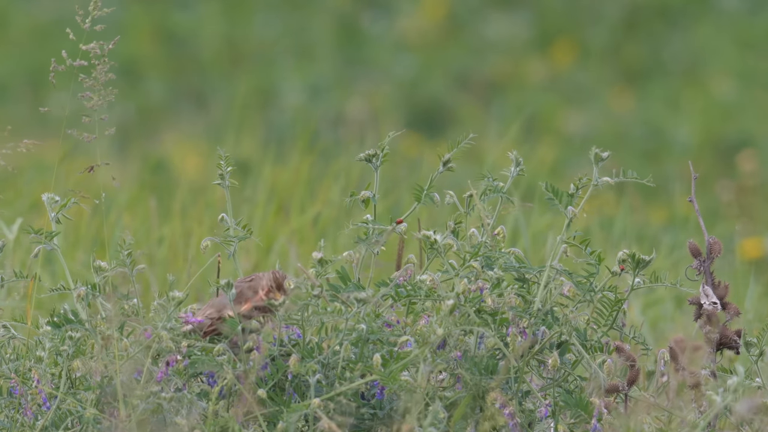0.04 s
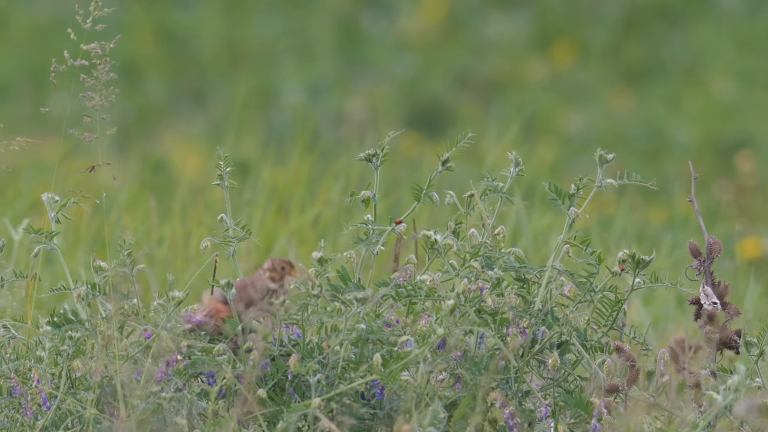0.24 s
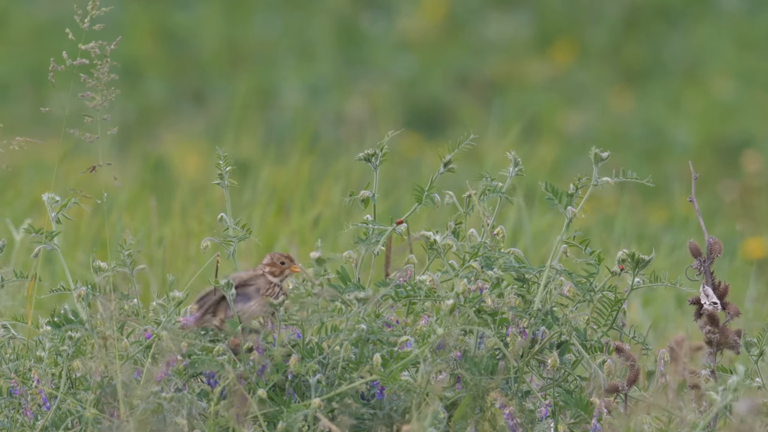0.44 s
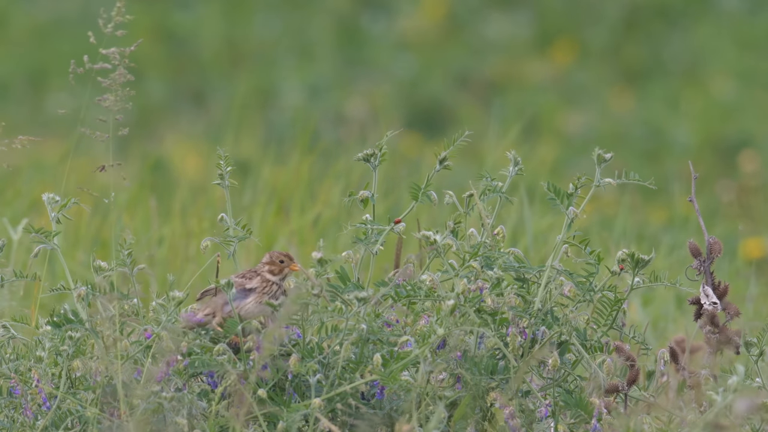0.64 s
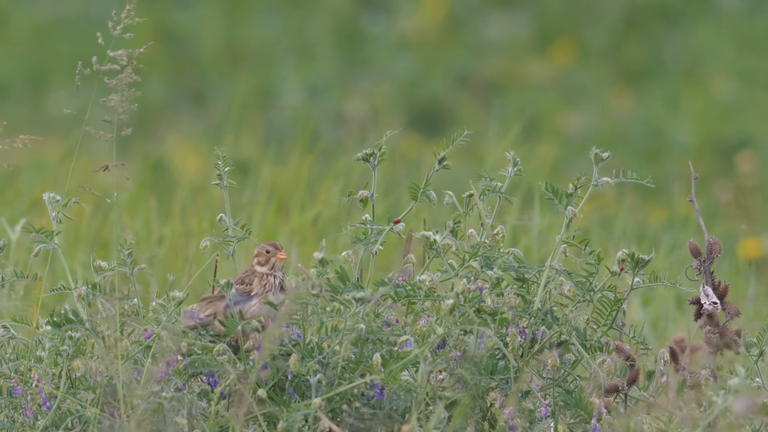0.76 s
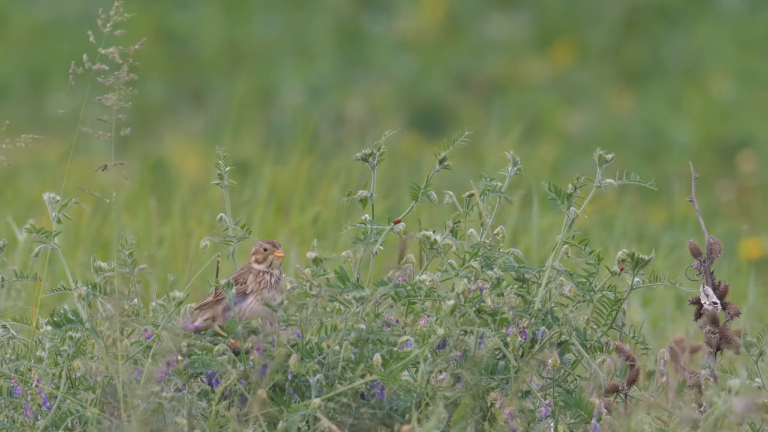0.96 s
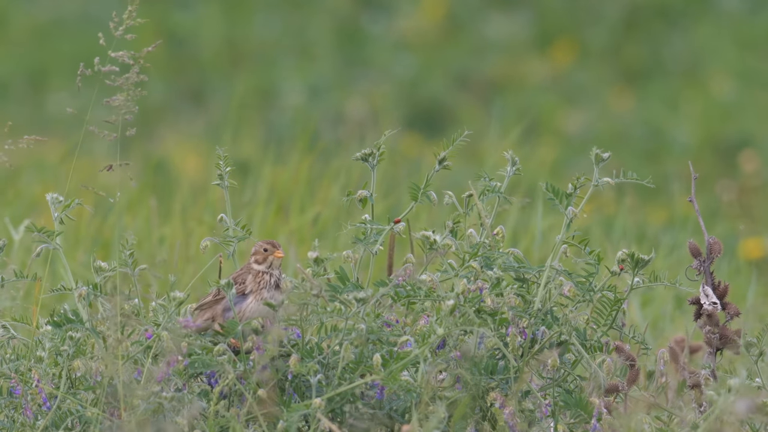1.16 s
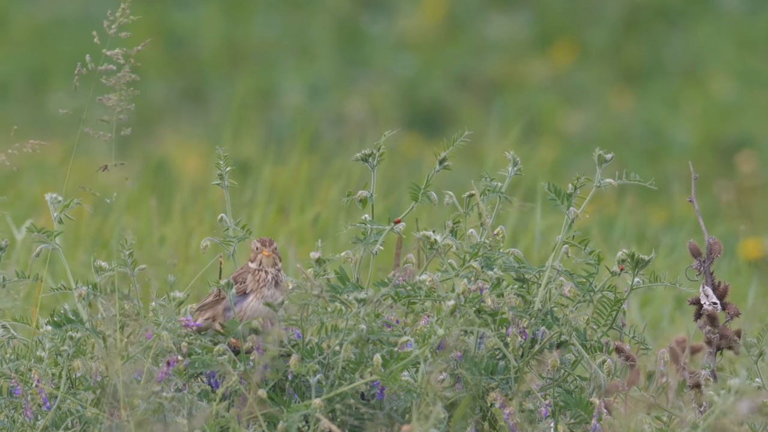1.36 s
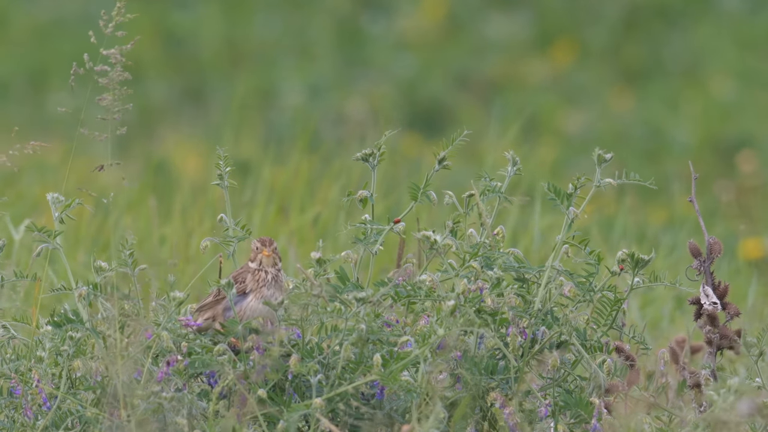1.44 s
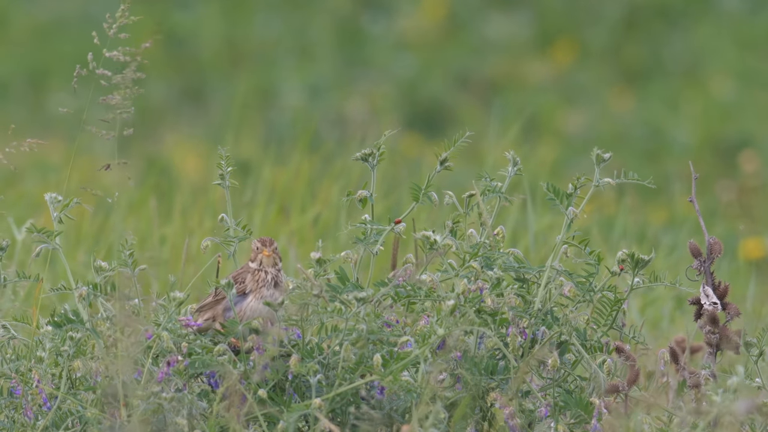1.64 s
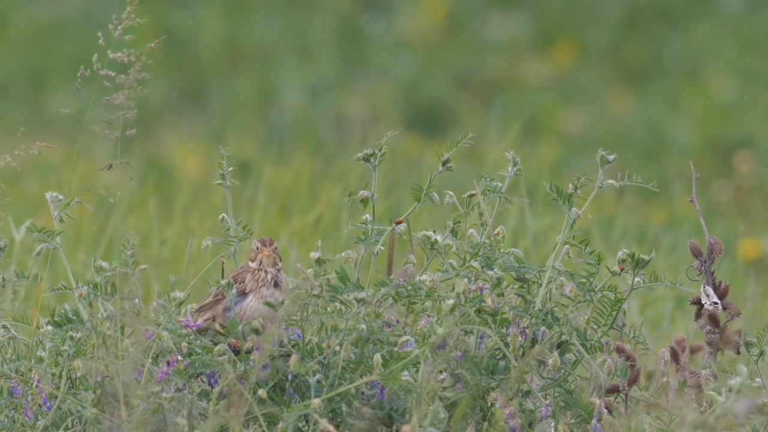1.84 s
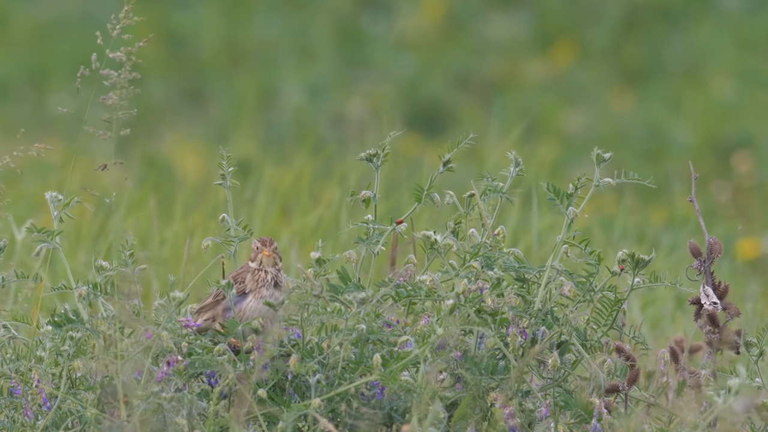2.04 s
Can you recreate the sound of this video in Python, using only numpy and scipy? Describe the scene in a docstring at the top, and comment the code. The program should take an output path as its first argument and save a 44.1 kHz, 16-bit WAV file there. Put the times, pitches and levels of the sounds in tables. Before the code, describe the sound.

A bunting ticks, rattles and trills while other birds call over a soft wind hiss.

```python
"""Songbirds in an open meadow

One bird throws out a bright, falling, warbling burst. A bunting ticks faster and faster, breaks into a
jangling rattle and ends in a trill. Other birds call farther off, over a steady hiss of wind in the grass.
Each note is a gliding whistle (a sine wave that slides in pitch), scattered a little by the plants."""
import sys
import numpy as np
from scipy import signal
from scipy.fft import rfft, irfft
from scipy.io import wavfile
from scipy.ndimage import uniform_filter1d

SR = 44100
rng = np.random.default_rng(int(sys.argv[2]) if len(sys.argv) > 2 else 0)


def master_out(mix):
    """Clip the mix to full scale and print it as 16-bit PCM to the path in sys.argv[1]."""
    frames = np.transpose(np.atleast_2d(mix))
    ceiling = np.clip(frames, -1, 1)
    pcm = np.round(ceiling * 32767).astype(np.int16)
    wavfile.write(sys.argv[1], SR, pcm)


N = 92610
WAVER_HZ, WAVER_DB = 36.3, 0.04   # how unsteady a bird's pitch and loudness are


def from_db(db):
    """Turn decibels (dB) into a number to multiply a sound by."""
    return 10 ** (np.asarray(db) / 20)


def rms_one(x):
    """Scale a signal so that its average strength (rms) is 1."""
    return x / np.sqrt(np.mean(x ** 2) + 1e-20)


def at_hz(points, hz):
    """Read between the rows of a (frequency, value) table, giving each octave equal room."""
    freqs, values = np.array(points).T
    return np.interp(np.log(hz + 1e-9), np.log(freqs), values)


def drift(rate_hz):
    """A smooth random wobble of about size 1; a higher rate makes it quicker."""
    r = np.exp(-2 * np.pi * rate_hz / SR)
    return rms_one(signal.lfilter([1], [1, -2 * r, r * r], rng.standard_normal(N + SR))[SR:])


def span(start_s, length_s):
    """The sample numbers i that a note covers, and its progress u from 0 to 1."""
    i = np.arange(max(int(start_s * SR) + 1, 0), min(int((start_s + length_s) * SR), N))
    return i, (i / SR - start_s) / length_s


def glides(rows):
    """Notes that bend smoothly through a start, middle and end pitch."""
    for start_s, length_s, first, middle, last, db in rows:
        i, u = span(start_s, length_s)
        bend = (2 * middle - first - last) * 2 * u * (1 - u)
        yield i, u, first + (last - first) * u + bend, db


def runs(rows, note_s):
    """One short glide repeated evenly, growing louder or softer along the run."""
    for start_s, count, spacing_s, first, last, first_db, last_db in rows:
        for k, db in enumerate(np.linspace(first_db, last_db, count)):
            yield from glides([(start_s + k * spacing_s, note_s, first, (first + last) / 2, last, db)])


def sing(notes):
    """A bird's voice box: one slightly unsteady sine wave for each note (samples, progress, Hz, dB)."""
    out, waver_hz, waver_db = np.zeros(N), WAVER_HZ * drift(160), WAVER_DB * drift(160)
    edge = 0.36   # share of a note spent fading in, and again fading out
    for i, u, hz, db in notes:
        phase = 2 * np.pi * np.cumsum(hz + waver_hz[i] * hz / 5000) / SR   # high notes waver more
        fade = np.sin(np.pi / 2 * np.clip(np.minimum(u, 1 - u) / edge, 0, 1))
        out[i] += fade * from_db(db + waver_db[i]) * np.sin(phase)
    return out


def stereo_noise(spectrum):
    """Shaped noise, alike in both ears in the bass and almost unrelated in the treble."""
    # How alike left and right are. Each row: frequency in Hz, likeness (1 the same, 0 unrelated).
    likeness = [(60, 0.96), (170, 1), (350, 0.97), (700, 0.77), (1400, -0.06), (2800, 0.079), (5500, -0.22),
                (12000, 0.077)]
    hz = np.arange(N // 2 + 1) * SR / N
    mid, side = rfft(rng.standard_normal((2, N)))
    alike = at_hz(likeness, hz)
    pair = np.sqrt(1 + alike) * mid + np.sqrt(1 - alike) * side * [[1], [-1]]
    return rms_one(irfft(from_db(at_hz(spectrum, hz)) * pair, N))


def wind():
    """The steady rush of wind and far-off air."""
    # The tone of the wind. Each row: frequency in Hz, relative level in dB.
    spectrum = [(20, -20), (35, -9), (55, -3), (130, -1), (330, 0), (650, -2), (1000, -3.5), (1800, -5),
                (2400, -9), (3300, -8), (7000, -17.5), (9000, -12), (12000, -14.5), (15500, -20.5)]
    return from_db(-59.5) * stereo_noise(spectrum)


def grass_and_chorus():
    """Grass and distant birds blend into a high hiss in which each narrow band flickers by itself."""
    # The tone of the hiss. Each row: frequency in Hz, relative level in dB.
    spectrum = [(2300, -29), (3200, -5.5), (4000, -1.5), (5000, 3.5), (5700, 1), (6700, -7), (7400, -4.5),
                (8200, -69)]
    hiss, hz = rfft(stereo_noise(spectrum)), np.arange(N // 2 + 1) * SR / N
    edges_hz, flicker_db, out = np.geomspace(2400, 8400, num=13), 2, 0
    for low, high in zip(edges_hz, edges_hz[1:]):
        band = irfft(hiss * (hz >= low) * (hz < high), N)
        out = out + band * from_db(flicker_db * drift(23))
    return from_db(-61.5) * rms_one(out) * from_db([[-1.75], [1.75]])   # louder on the right


def chirps():
    """Tiny, faint slides up or down, at random times, from birds all over the meadow."""
    per_second, length_s, low_hz, high_hz, max_slide_hz = 49, .011, 3398, 6840, 487
    for when, pitch, slide, softness in rng.random((int(per_second * N / SR), 4)):
        hz, half = low_hz + (high_hz - low_hz) * pitch, max_slide_hz * (slide - .5)
        yield from glides([(when * N / SR, length_s, hz + half, hz, hz - half, -59.5 - 4 * softness)])


def falling_burst():
    """One unbroken, warbling whistle that slurs from note to note."""
    # The burst's notes. Each row: start and length in seconds, start, middle and end pitch in Hz,
    # level in dB.
    notes = [(.052, 0.033, 6760, 7000, 7200, -57), (.088, .044, 7400, 7000, 6660, -52),
             (.130, .034, 6800, 6410, 6000, -36), (.161, 0.0037, 6200, 5270, 4100, -44),
             (.178, .009, 4095, 5850, 7040, -41.5), (.190, 0.0055, 7220, 5990, 4200, -42),
             (.195, 0.01, 3920, 6580, 4040, -36), (.208, 0.009, 4360, 6270, 4740, -32.5),
             (.220, .012, 5080, 5830, 5020, -32), (.231, 0.019, 5850, 5670, 5320, -34.5),
             (.256, 0.013, 6800, 6330, 6200, -38), (.266, 0.0083, 5810, 6170, 6350, -39),
             (.277, .014, 6960, 6300, 5500, -39.5), (.289, 0.012, 6060, 5930, 5400, -35.5),
             (.301, 0.012, 5870, 5660, 4900, -36.5), (.311, 0.018, 5250, 4890, 4370, -44)]
    pitch, gain = np.zeros(N), np.zeros(N)
    for i, u, hz, db in glides(notes):
        pitch[i], gain[i] = hz, from_db(db)
    sung = np.flatnonzero(pitch)
    pitch = np.interp(np.arange(N), sung, pitch[sung]) + WAVER_HZ * drift(204)   # slide across the gaps
    slur = int(0.0018 * SR)   # the notes run into each other over this many samples
    gain = uniform_filter1d(uniform_filter1d(gain, slur), slur) * from_db(WAVER_DB * drift(120))
    return gain * np.sin(2 * np.pi * np.cumsum(pitch) / SR)


def ticks():
    """Each of the bunting's ticks opens with a rasp, catches briefly and ends as a clean falling note."""
    # The ticks. Each row: start in seconds, pitch in Hz, level in dB.
    notes = [(0.099, 4640, -44.5), (0.37, 4900, -50), (.473, 4880, -46), (.561, 4820, -43),
             (.634, 4770, -44), (0.704, 4930, -40), (0.77, 4970, -42.5)]
    length_s, rasp_hz, rasps_per_s, rasp_db, catch_db = .026, 520, 450, -1, -7
    rough = drift(850)
    for start_s, hz, db in notes:
        i, u = span(start_s, length_s)
        opening = np.clip((.5 - u) * 10, 0, 1)   # 1 at first, 0 from halfway on
        rasp = opening * (np.sin(2 * np.pi * rasps_per_s * u * length_s) + rough[i]) / 2
        catch = np.exp(-((u - .5) * 20) ** 2)
        fall_hz = (1 - opening) * 1200 * (.565 - u)
        yield i, u, hz + rasp_hz * rasp + fall_hz, db + rasp_db * opening + catch_db * catch


def far_calls():
    """Single whistles from birds farther off."""
    # The calls. Each row: start and length in seconds, start, middle and end pitch in Hz, level in dB.
    notes = [(.111, 0.0097, 4640, 4400, 4280, -45.5), (.131, 0.01, 4200, 4330, 4600, -57),
             (.148, 0.01, 3770, 3880, 4250, -58), (.166, .010, 3700, 3620, 3480, -54),
             (.186, 0.013, 3450, 3280, 3130, -53.5), (.248, 0.013, 4750, 4390, 4170, -45),
             (.333, 0.017, 5070, 4600, 3700, -51.5), (.413, 0.0066, 5050, 5030, 4950, -61),
             (.444, 0.013, 6600, 6100, 5950, -54.5), (.555, 0.095, 6040, 6790, 6550, -57.5),
             (.654, 0.012, 6300, 5600, 5600, -52), (.525, 0.13, 1930, 1845, 1770, -61),
             (.910, .050, 2578, 2484, 2416, -53.5), (.910, 0.034, 3950, 3650, 3350, -61.5),
             (.940, .035, 7100, 6780, 6160, -53), (.980, 0.09, 3850, 4030, 4340, -60),
             (1.165, 0.061, 3350, 3850, 3330, -54), (1.232, 0.023, 3430, 3360, 2930, -46.5),
             (1.275, .090, 3950, 4240, 4650, -57.5), (1.285, .075, 4110, 3840, 3700, -61),
             (1.340, 0.085, 3490, 3670, 3040, -51), (1.420, .130, 3590, 3370, 3230, -60),
             (1.514, 0.0257, 2620, 2315, 2080, -55.5), (1.606, 0.016, 3690, 2636, 1960, -54),
             (1.741, 0.024, 2280, 2272, 2230, -51.5), (1.700, 0.087, 6780, 6690, 5400, -64),
             (1.770, 0.039, 5190, 4230, 3600, -60.5), (1.895, 0.092, 1750, 1727, 1460, -59.5),
             (2.052, 0.046, 4500, 4550, 4580, -54.5), (.905, .030, 1950, 1785, 1690, -64),
             (.955, 0.03, 1650, 1500, 1410, -63), (1.575, 0.026, 2670, 2780, 2900, -59.5),
             (1.672, .014, 4200, 4340, 4650, -61.5)]
    return glides(notes)


def twitters():
    """Distant birds repeat one tiny note quickly."""
    # The twitters. Each row: start in seconds, number of notes, spacing in seconds,
    # each note's start and end pitch in Hz, first and last note's level in dB.
    rows = [(.538, 7, .041, 3540, 3320, -61, -60.5), (1.718, 7, .0135, 3636, 3190, -54.5, -59.5),
            (1.765, 4, .0115, 4210, 3740, -75, -67), (1.985, 5, .024, 6430, 6740, -65, -57)]
    return runs(rows, note_s=0.0145)


def cuckoo():
    """A cuckoo very far away sings two notes, the second one lower."""
    # The notes. Each row: start and length in seconds, start, middle and end pitch in Hz, level in dB.
    notes = [(.660, 0.107, 647, 632, 575, -63.5), (.935, 0.12, 544, 552.4, 544, -61.5)]
    return glides(notes)


def jangle():
    """The bunting's rattle is flung between a high and a low voice."""
    # The notes. Each row: start and length in seconds, start, middle and end pitch in Hz, level in dB.
    notes = [(.809, 0.0074, 7200, 7030, 7100, -44), (.823, 0.0076, 6400, 7000, 7340, -45),
             (.971, 0.01, 5630, 5580, 5300, -51), (.991, 0.011, 7660, 5520, 5070, -39.5),
             (1.034, 0.0061, 5740, 5320, 5100, -40), (1.061, 0.013, 5740, 5420, 5150, -40.5),
             (1.075, 0.0074, 7200, 7100, 6900, -43), (1.108, 0.0079, 6900, 7140, 6000, -41),
             (1.112, 0.0076, 6060, 5370, 5400, -40.5), (1.130, .010, 5600, 7000, 7100, -44),
             (1.145, 0.02, 7030, 7250, 7130, -40), (1.161, .006, 7200, 6170, 5300, -41),
             (1.165, 0.0058, 5400, 5500, 5250, -42), (1.176, 0.0086, 5100, 5050, 4850, -48.5),
             (1.191, 0.0075, 4850, 4780, 4600, -44.5), (1.207, 0.0075, 4650, 4490, 4480, -43.5),
             (1.224, 0.0073, 4500, 4380, 4300, -48), (1.244, 0.011, 4300, 4130, 4000, -52),
             (1.225, 0.0063, 7300, 7240, 7200, -43), (1.237, 0.0063, 7050, 7200, 7200, -43),
             (1.253, 0.015, 5880, 5460, 5120, -43.5), (1.275, 0.0059, 6930, 7220, 7350, -35),
             (1.287, 0.0052, 7060, 7240, 7400, -36.5), (1.302, 0.0089, 6750, 7200, 7700, -33.5),
             (1.321, .011, 5900, 5500, 5100, -43.5), (1.342, 0.0096, 7000, 7300, 7440, -40.5),
             (1.371, 0.0078, 7640, 6830, 5300, -38.5), (1.384, 0.013, 7020, 6880, 5240, -37),
             (1.399, 0.01, 7150, 6800, 5570, -44), (1.416, 0.0095, 7370, 6540, 4800, -38)]
    return glides(notes)


def chips():
    """Runs of very short notes that swell inside the rattle."""
    # The runs. Each row: start in seconds, number of chips, spacing in seconds,
    # each chip's start and end pitch in Hz, first and last chip's level in dB.
    rows = [(.843, 8, .0137, 5560, 4880, -49, -41.5), (.966, 9, .0134, 3980, 5710, -53, -48),
            (1.2405, 4, 0.034, 6900, 4640, -47.5, -44)]
    return runs(rows, note_s=0.00546)


def buzzes():
    """The bunting whips its pitch up and down hundreds of times a second, which sounds like a buzz."""
    # The rattle's buzzes. Each row: start and length in seconds, pitch and its swing each way in Hz,
    # sweeps per second, start and end level in dB.
    notes = [(.850, 0.12, 5170, 545, 320, -43.5, -49), (0.975, 0.047, 5550, 496, 310, -44, -51),
             (1.005, 0.076, 5630, 1220, 264, -43.5, -45), (1.082, 0.032, 5700, 480, 310, -40, -46.5),
             (1.12, 0.051, 5510, 614, 210, -43.5, -49), (1.201, 0.016, 5400, 700, 430, -49, -35.5),
             (1.339, 0.11, 5300, 400, 200, -53, -48.5), (1.46, 0.023, 5290, 600, 400, -53.5, -41.5)]
    uneven, throbs_per_s = drift(128), 76
    for start_s, length_s, hz, swing, rate, start_db, end_db in notes:
        i, u = span(start_s, length_s)
        turn = 2 * np.pi * np.cumsum(rate * (1 + 0.207 * uneven[i])) / SR
        sweep_db = 3.3 * (np.sin(turn) - 1)   # louder on the way down
        throb_db = -np.sin(2 * np.pi * throbs_per_s * u * length_s)
        yield i, u, hz + swing * np.cos(turn), start_db + (end_db - start_db) * u + sweep_db + throb_db


def croak():
    """One hoarse, far call: tones at three and four times the shaky pitch of a low voice."""
    i, u = span(start_s=1.255, length_s=0.038)
    hz, db = 422.4 * (1 + 0.075 * drift(240)[i]), -57
    return [(i, u, harmonic * hz, db) for harmonic in (3, 4)]


def trill():
    """Two closing trills, made of short notes that all slide down in the same way."""
    # The notes. Each row: start in seconds, middle pitch in Hz, level in dB.
    notes = [(1.488, 6800, -47), (1.515, 6750, -43), (1.541, 6630, -45), (1.571, 6730, -42),
             (1.599, 6450, -49), (1.63, 6600, -51), (1.842, 5280, -64), (1.888, 5370, -60.5),
             (1.922, 5300, -61), (1.953, 5420, -55), (1.986, 5420, -52.5), (2.023, 5450, -52),
             (2.071, 5300, -58)]
    length_s, fall_hz = 0.0125, 950
    return glides((s, length_s, hz + fall_hz / 2, hz, hz - fall_hz / 2, db) for s, hz, db in notes)


def echoes(fade_s):
    """The left and right spectrum of a wash of tiny echoes that dies away by 60 dB in fade_s seconds."""
    t = np.arange(SR // 2) / SR
    wash = rng.standard_normal((2, len(t))) * from_db(-60 * t / fade_s)
    return rfft(wash / np.sqrt((wash ** 2).sum(axis=1, keepdims=True)), 2 * N)


def meadow(voice, singer):
    """Place a singer between two microphones; add quick scatter from the plants and a fainter tail."""
    # Scatter from the plants. Each entry: singer, level in dB compared with the direct sound.
    scatter_db = {"burst": -14, "ticks": -4.5, "rattle": -7, "far": -3}
    # Each microphone hears the birds with its own tone. Each row: frequency in Hz, left minus right in dB.
    balance_db = [(600, -1.5), (1800, 0), (2450, 13), (3300, -1), (4400, -3), (5000, -11), (6300, -7.5),
                  (6800, -7.5), (7250, -6.5)]
    hz, right_lag_s = np.arange(N + 1) * SR / (2 * N), 0.000214
    scatter = from_db(scatter_db[singer]) * echoes(fade_s=0.072)
    tail = from_db(scatter_db[singer] - 3.5) * echoes(fade_s=0.26)
    direct = np.exp(-2j * np.pi * hz * right_lag_s * np.array([[0], [1]]))
    balance = from_db(at_hz(balance_db, hz) * np.array([[.5], [-.5]]))
    path = balance * (direct + scatter) + tail
    return irfft(rfft(voice, 2 * N) * path, 2 * N)[:, :N]


def scene():
    """All the singers over the wind."""
    air = grass_and_chorus() + wind()
    burst = meadow(falling_burst(), "burst")
    ticking = meadow(sing(ticks()), "ticks")
    rattle = meadow(sing([*buzzes(), *chips(), *jangle(), *trill()]), "rattle")
    far = meadow(sing([*far_calls(), *cuckoo(), *twitters(), *croak()]), "far")
    return air + burst + ticking + rattle + far + meadow(sing(chirps()), "far")


def record(dry):
    """The recorder turns down two narrow bands and cuts off the highest treble."""
    # The dips in the recorder's tone. Each row: frequency in Hz, width in Hz.
    notches = [(2610, 476), (7740, 1160)]
    out, cutoff_hz = dry, 15700
    for hz, width in notches:
        out = signal.lfilter(*signal.iirnotch(hz, hz / width, fs=SR), out)
    return signal.sosfilt(signal.ellip(12, .1, 70, cutoff_hz, fs=SR, output="sos"), out)


dry = scene()
out = record(dry)
master_out(out)
```